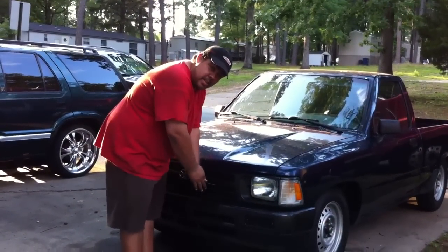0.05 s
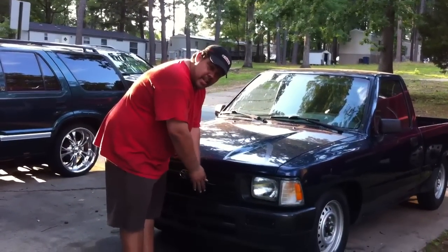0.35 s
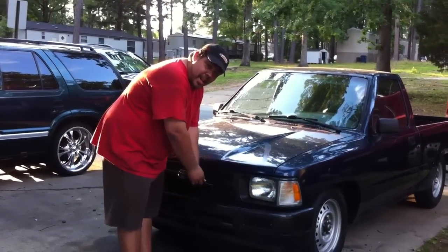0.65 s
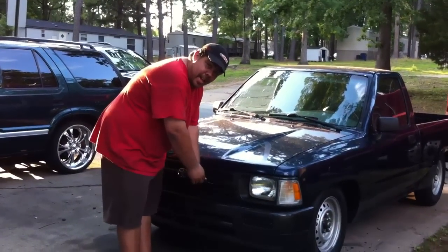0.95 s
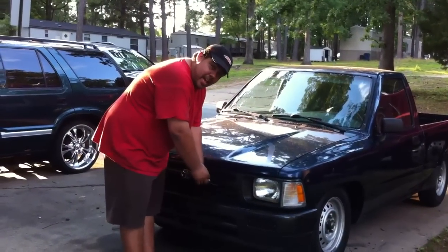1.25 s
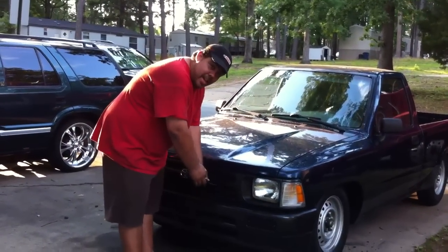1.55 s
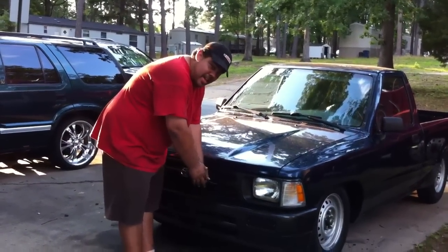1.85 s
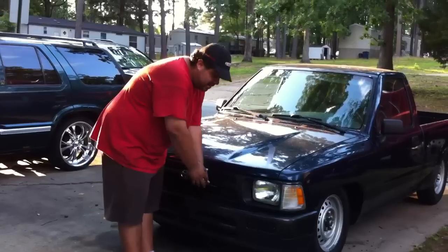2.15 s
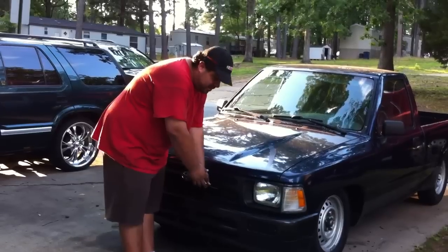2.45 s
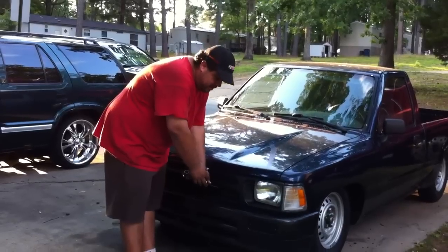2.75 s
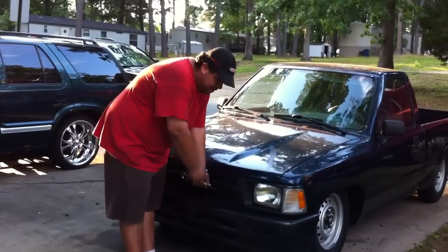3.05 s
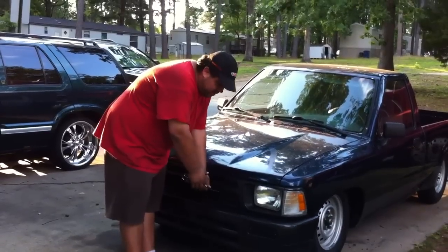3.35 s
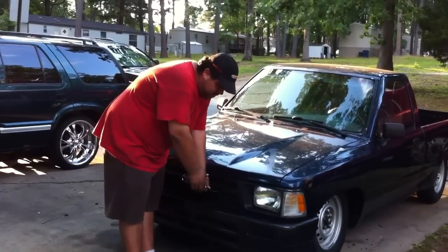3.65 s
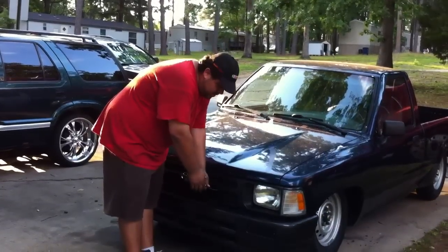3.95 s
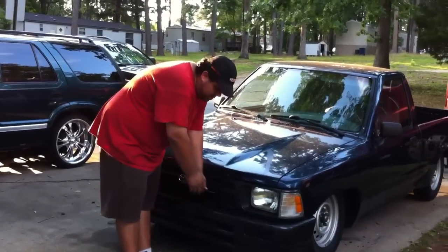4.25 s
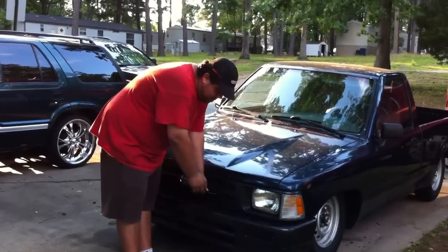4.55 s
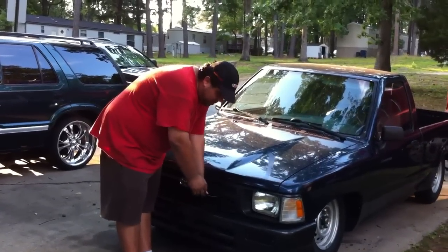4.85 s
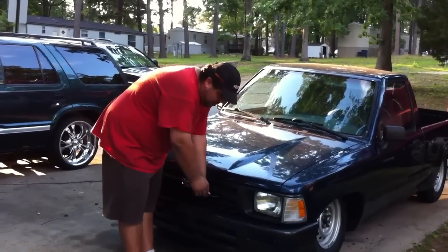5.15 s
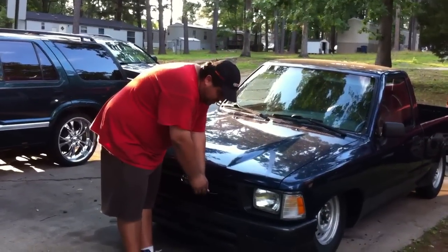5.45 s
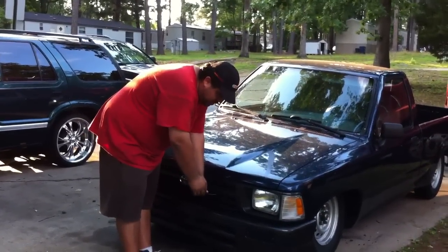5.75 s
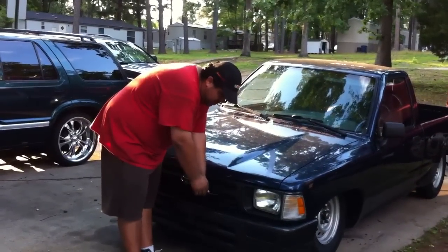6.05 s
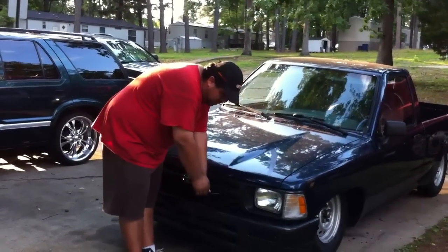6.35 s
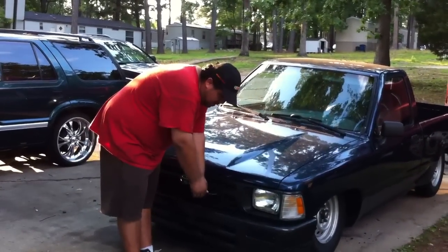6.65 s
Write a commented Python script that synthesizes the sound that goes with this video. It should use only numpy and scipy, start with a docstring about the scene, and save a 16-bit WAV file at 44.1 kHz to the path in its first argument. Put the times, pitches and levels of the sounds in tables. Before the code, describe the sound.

In an open yard, a single nearby microphone picks up a sharp, continuous hiss of air escaping from a valve on a pickup. It wavers slightly and carries airy, shifting whistles, one slowly rising in pitch. The hiss weakens gradually, then faster toward the end as the air runs out. A quiet low rumble lies underneath, and a far-off dove coos twice, barely audible, a little after halfway.

```python
"""Compressed air hisses from a hand-held valve, close by at the front of a pickup, as an air bag empties.
The jet flutters, narrows and fades as the pressure drops; breathy whistles come and go in it.
The hollow behind the grille rings along, and echoes off the bodywork shift as the hand moves.
One microphone in an open yard, with a low rumble behind and two faint coos from a far-off dove."""
import sys
import numpy as np
from scipy import signal
from scipy.fft import rfft, irfft, next_fast_len
from scipy.io import wavfile
from scipy.ndimage import uniform_filter1d, map_coordinates

SR = 44100
rng = np.random.default_rng(int(sys.argv[2]) if len(sys.argv) > 2 else 0)


def put_to_file(sound):
    """Save the sound as 16-bit audio at rate SR, in the file named by the first command-line argument."""
    columns = np.atleast_2d(sound).T  # one column per channel
    safe = np.clip(columns, -1, 1)
    whole_steps = np.round(safe * 32767)
    wavfile.write(sys.argv[1], SR, whole_steps.astype(np.int16))


N = 304731
TIME = np.arange(N) / SR


def amp(db):
    """Decibels to gain."""
    return 10 ** (np.asarray(db) / 20)


def unit(x):
    """x at rms 1."""
    return x / np.sqrt(np.mean(np.abs(x) ** 2) + 1e-20)


def along(points, hz):
    """Level in dB at hz, read between (freq_hz, level_db) points on a log axis."""
    freq_hz, level_db = np.transpose(points)
    return np.interp(np.log(hz + 1), np.log(freq_hz + 1), level_db)


def bell(hz, centre, width):
    """The shape of one resonance, 1 at its centre."""
    return 1 / (1 + (2 * (hz - centre) / width) ** 2)


def step(at_s, fade_s):
    """A smooth rise from 0 to 1 around at_s."""
    return 0.5 + 0.5 * np.tanh((TIME - at_s) / (2 * fade_s))


def spell(start, end, fade_s):
    """A gate that fades in around start and out around end."""
    return step(start, fade_s) - step(end, fade_s)


def wobble(rate):
    """A smooth random curve, rate knots a second."""
    return map_coordinates(rng.standard_normal(int(N * rate / SR) + 4), [TIME * rate])


def filtered(x, response):
    """x shaped by a gain that depends on frequency."""
    size = next_fast_len(N + SR // 2)
    return irfft(rfft(x, size) * response(np.fft.rfftfreq(size, 1 / SR)), size)[:N]


def noise(response):
    """Coloured noise of rms 1."""
    return unit(filtered(rng.standard_normal(N), response))


def band(centre, width):
    """A narrow band of noise of rms 1."""
    return noise(lambda hz: bell(hz, centre, width) ** 2)


def notes(rows, fade_s):
    """A (noise band, gain curve) pair for each row."""
    return [(band(centre, width), amp(db) * spell(start, end, fade_s))
            for start, end, centre, width, db in rows]


def pressure_at(t, sag_s=0.63, spent_s=4.6):
    """Bag pressure on a scale from 1 (full) to 0 (nearly empty), falling evenly after sag_s."""
    return np.clip((spent_s - t) / (spent_s - sag_s), 0, 1)


def emptying_db(empty_s=7.21, fade_power=0.79):
    """The flow sinks slowly at first, then ever faster as the bag runs out."""
    return fade_power * 20 * np.log10(np.maximum(1 - TIME / empty_s, 1e-3))


def broad_hiss(patchy_db):
    """Turbulence of the jet: a wide band at full pressure, a narrower one as the rubber bag empties."""
    # jet spectrum from a full and from a nearly empty bag: freq_hz, level_db
    jet_full = [(300, -34.5), (650, -22), (1050, -14), (1500, -10.5), (2900, -8.5), (3200, -12.5),
                (4900, -10), (5700, -4), (7300, 0), (8100, 1), (11500, 2), (12900, 2.5), (13700, -3),
                (15700, -7)]
    jet_spent = [(300, -33), (1000, -25), (2500, -18.5), (3800, -13.5), (4900, -18.5), (5600, -6.5),
                 (7400, -10), (8600, -0.5), (11000, 0), (13000, -1), (14000, -9), (15700, -21)]
    # peaks and dips from the valve stem and fingers: centre_hz, width_hz, full_db, spent_db
    stem = [(3800, 240, 3.5, -0.5), (4280, 390, -6, -6.5), (4840, 220, -6.5, 4), (5310, 180, -3, 6.5),
            (5840, 150, -6.5, 3), (6335, 340, -3.5, 10), (6650, 230, 4.5, -4), (6990, 210, 3, 5.5),
            (7270, 205, -13, -6), (13100, 400, 0.5, -2.5)]
    hz, t, spectrum = signal.stft(rng.standard_normal(N), SR, nperseg=1024)
    pressure = pressure_at(t)
    full_db = along(jet_full, hz) + sum(db * bell(hz, centre, width) for centre, width, db, _ in stem)
    spent_db = along(jet_spent, hz) + sum(db * bell(hz, centre, width) for centre, width, _, db in stem)
    colour_db = np.outer(full_db, pressure) + np.outer(spent_db, 1 - pressure)
    # the jet wanders, so neighbouring bands swell and sink on their own
    patches = uniform_filter1d(rng.standard_normal(spectrum.shape), size=4, axis=0)
    patches = uniform_filter1d(patches, size=50, axis=1)
    gain = amp(colour_db + patchy_db * unit(patches))
    _, hiss = signal.istft(spectrum * gain / np.linalg.norm(gain, axis=0), SR)
    return unit(hiss[:N])


def whistles():
    """Breathy whistles catch in the valve and let go."""
    # whistles, levels against the broad hiss: start_s, end_s, centre_hz, width_hz, level_db
    whistle_notes = [(-.2, .3, 8700, 400, -9), (-.2, .85, 5910, 600, -13.5), (-.2, 1.35, 2770, 500, -24),
                     (.15, 0.76, 12240, 1200, 0), (.75, 1.54, 12040, 800, -2.5),
                     (1.25, 1.9, 3650, 500, -26.5), (1.3, 2.3, 10730, 450, -12), (1.3, 4.5, 5400, 260, -20),
                     (1.5, 2.38, 12130, 1210, -7.5), (2.0, 5, 4350, 910, -24), (2.55, 3.8, 10720, 450, -9),
                     (3.4, 4.9, 12550, 1200, -5), (3.45, 4.13, 11090, 446, -4.5),
                     (4.15, 4.4, 10600, 448.3, -2.5), (4.6, 6.7, 5900, 900, -14),
                     (5.65, 5.9, 11970, 500, -2.5), (6.0, 7.2, 3780, 350, -23.5),
                     (6.1, 7.2, 10870, 450, -3.5)]
    return notes(whistle_notes, fade_s=0.066)


def hoots():
    """A breathy low note of the valve; after it ends, the hollow behind the grille rings on, higher and weaker."""
    # the valve's low note, then the hollow's higher ring, levels against the broad hiss: start_s, end_s,
    # centre_hz, width_hz, level_db
    hoot_notes = [(-.2, 0.98, 2092, 298, -16.5), (1.0, 4.3, 2200, 300, -22)]
    return notes(hoot_notes, fade_s=0.024)


def jet():
    """Hiss and whistles share the flow; the jet flutters most while the pressure is high."""
    parts = [(broad_hiss(patchy_db=2.5), 1), climbing_whistle(), *whistles(), *hoots()]
    air = sum(gain * sound for sound, gain in parts)
    total_gain = np.sqrt(sum(gain ** 2 for _, gain in parts))
    flutter_db = 0.3148 * (0.5 + pressure_at(TIME)) * wobble(70)
    return air / total_gain * amp(flutter_db)


def valve(full_db=-23):
    """Close to the microphone, the jet fades with the bag and follows the grip of the hand."""
    # the hand opens the valve a little more or less: start_s, end_s, change_db
    grip = [(-.2, 0.247, -1.4), (0.283, .38, 2.5), (0.467, .57, 1.8), (.68, 1.104, -0.7),
            (1.302, 1.68, -2.05), (1.75, 2.2, 0.8), (2.35, 3.3, -0.53), (3.506, 3.95, 0.5),
            (4.0, 4.454, 1.5)]
    grip_db = sum(db * spell(start, end, fade_s=0.029) for start, end, db in grip)
    return amp(full_db + emptying_db() + grip_db) * jet()


def bodywork(direct, sway_ms, sway_rate):
    """Near surfaces comb the sound at the microphone; the combs drift as the hand moves."""
    # echoes off ground and bodywork: delay_ms, relative_gain
    reflections = [(2.3, 0.15), (3.7, 0.072), (6.3, 0.15), (11, 0.21), (19, 0.15)]
    delayed = lambda ms: map_coordinates(direct, [(TIME - ms / 1000) * SR], order=5)
    echoes = sum(gain * delayed(ms + sway_ms * wobble(sway_rate)) for ms, gain in reflections)
    return (direct + echoes) / np.sqrt(1 + sum(gain ** 2 for _, gain in reflections))


def hollow(base_db=-43, flow_share=0.79, turn_s=0.94):
    """The air behind the grille rings, weakly until the jet turns into it at turn_s."""
    # resonances of the hollow: centre_hz, width_hz, level_db
    modes = [(990, 108, -2.5), (1387, 270, 1), (1817, 304, 4), (2280, 420, 0), (2640, 340, -8.5)]
    turned_away_db = -13.5 * (1 - step(turn_s, fade_s=0.15))
    level_db = base_db + flow_share * emptying_db() + turned_away_db
    power = lambda hz: sum((amp(db) * bell(hz, centre, width)) ** 2 for centre, width, db in modes)
    return amp(level_db) * noise(lambda hz: np.sqrt(power(hz)))


def yard(rumble_db=-55, drone_db=-66.5):
    """Low rumble of the neighbourhood around the yard, with a drone that swells unevenly."""
    # rumble spectrum: freq_hz, level_db
    rumble_colour = [(25, -22), (48, -46), (75, -21), (100, -4.5), (125, -4.5), (165, -3), (240, -2),
                     (450, -4.5), (700, -9), (1500, -10), (4000, -37), (12000, -45)]
    # the low sound rises and sinks: start_s, end_s, rumble_change_db, drone_change_db
    swells = [(.4, 1.149, -0.1, 7.5), (1.5, 2.8, -2.1, -4), (3.753, 5.152, 0, 4.5)]
    rumble_swell_db, drone_swell_db = sum(np.outer(changes_db, spell(start, end, fade_s=0.076))
                                          for start, end, *changes_db in swells)
    drone = amp(drone_db + drone_swell_db + 2.9 * wobble(6.7)) * band(centre=171, width=77)
    rumble = amp(rumble_db + rumble_swell_db) * noise(lambda hz: amp(along(rumble_colour, hz)))
    return rumble + drone


def climbing_whistle(start_hz=7730, climb_hz_per_s=210, width_hz=580):
    """The main whistle climbs steadily as the bag empties: a (noise band, gain curve) pair."""
    # its spells, levels against the broad hiss: start_s, end_s, level_db
    spells = [(1.4, 2.253, -7.5), (2.25, 3.9, -12.5), (3.893, 5.897, -4), (5.897, 7.197, -6)]
    gain = sum(amp(db) * spell(start, end, fade_s=0.066) for start, end, db in spells)
    phase = 2 * np.pi * np.cumsum(start_hz + climb_hz_per_s * TIME) / SR
    # two slow noises shifted up to the rising pitch
    whistle = band(0, width_hz) * np.cos(phase) + band(0, width_hz) * np.sin(phase)
    return whistle, gain


def dove():
    """Soft, pure notes from far off in the trees."""
    # coos: middle_s, length_s, pitch_hz, level_db
    coos = [(4.11, 0.49, 579, -63), (4.65, 0.17, 576, -57)]
    swell = lambda middle, length: np.sqrt(np.clip(1 - (2 * (TIME - middle) / length) ** 2, 0, 1))
    return sum(amp(db) * swell(middle, length) * np.sin(2 * np.pi * hz * TIME)
               for middle, length, hz, db in coos)


def scene():
    """Valve and pickup up close, yard and dove behind, in mono."""
    pickup = bodywork(valve(), sway_ms=0.054, sway_rate=1.296) + hollow()
    return (pickup + yard() + dove())[None]


def record(dry):
    """One microphone channel, with nothing above 15780 Hz."""
    return filtered(dry[0], lambda hz: hz < 15780)[None]


dry = scene()
out = record(dry)
put_to_file(out)
```